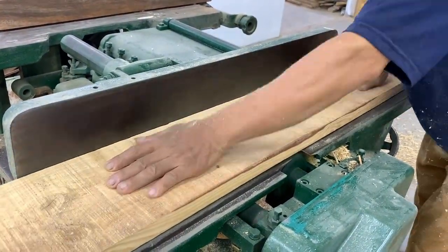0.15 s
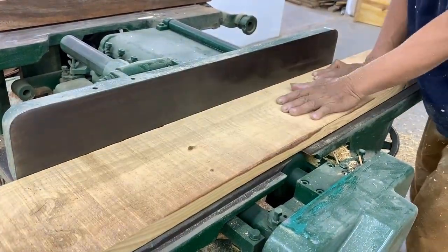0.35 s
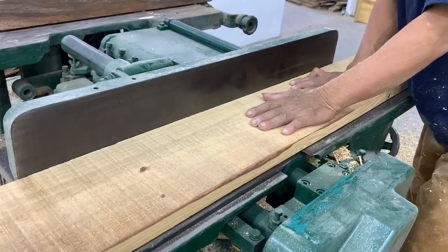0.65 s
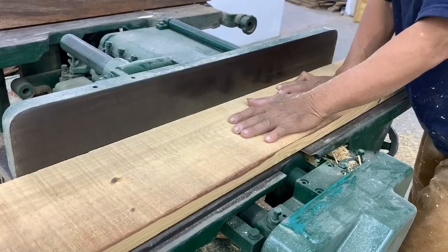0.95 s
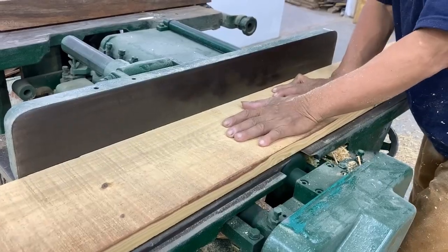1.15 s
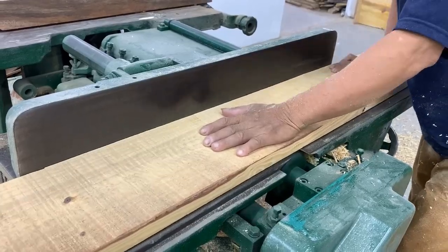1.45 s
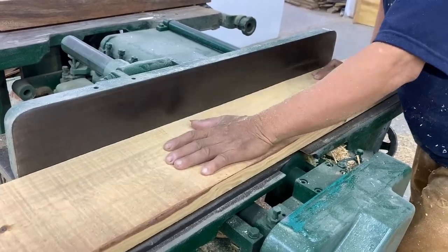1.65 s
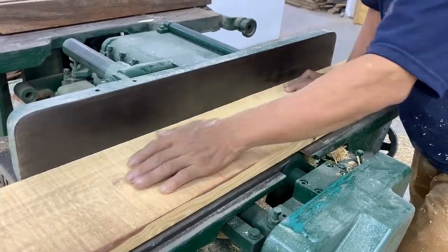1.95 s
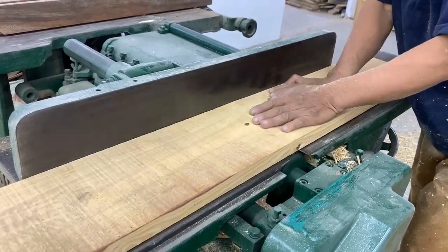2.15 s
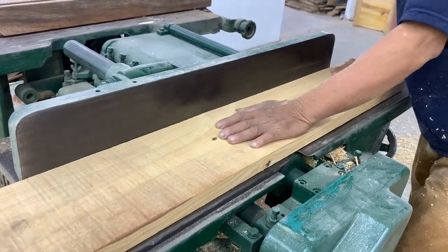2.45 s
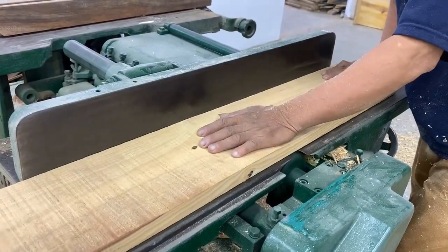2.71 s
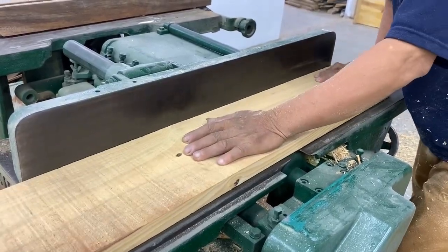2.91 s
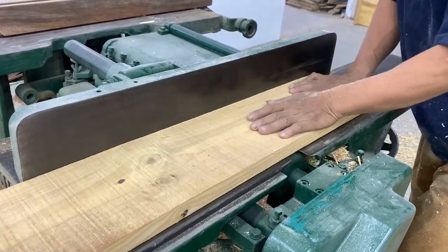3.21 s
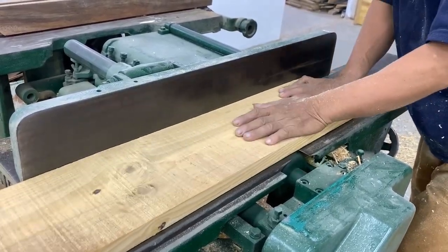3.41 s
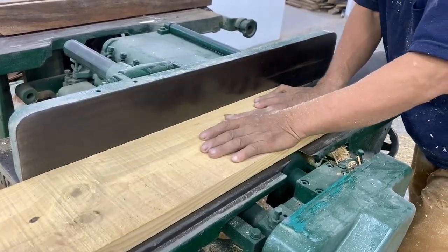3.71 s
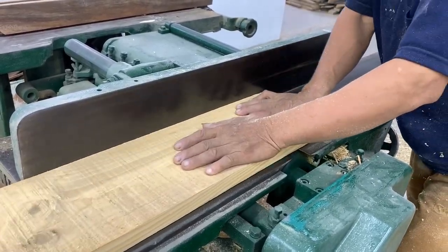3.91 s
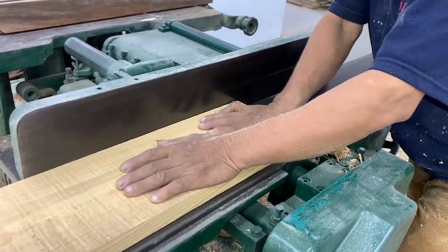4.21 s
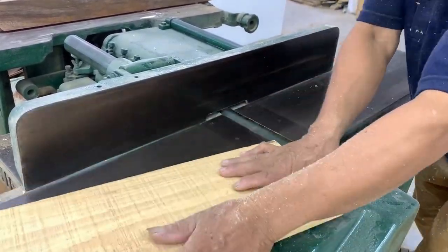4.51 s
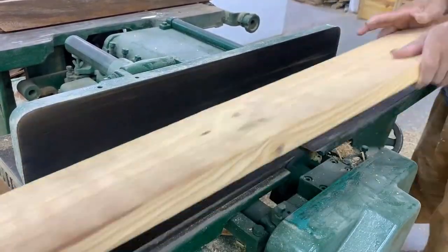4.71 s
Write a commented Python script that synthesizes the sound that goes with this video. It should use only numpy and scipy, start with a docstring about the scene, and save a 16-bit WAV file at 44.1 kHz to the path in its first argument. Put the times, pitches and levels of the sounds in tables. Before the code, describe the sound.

Close stereo pickup in a workshop: a jointer is already cutting, its rapid knives making a dense, bright buzz over a steady low hum, with motor whine, air rush and chip hiss. Pushes on the board make the cut swell and shift in colour. Near the end the board clears, the cut stops abruptly, and the bare machine hums on with faint wooden bumps.

```python
"""From the start a jointer's cutterhead planes a hand-pushed board: knife strikes as a tall harmonic stack
over the head's hum, whines of motor and drive as wavering tones, rush and chip hiss as shaped noise.
Shoves deepen the bite; splinters snap as short noise bursts. At 4.4 s the board clears the knives: the cut
dies, the bare head idles as fewer orders, and the lifted board bumps as decaying sines."""
import sys
import numpy as np
from scipy import signal
from scipy.io import wavfile
from scipy.ndimage import uniform_filter1d

SR = 44100
rng = np.random.default_rng(int(sys.argv[2]) if len(sys.argv) > 2 else 0)


def field_ratio(decibels):
    """Amplitude ratio for a level in dB (20 dB per decade); scalars and array-likes work."""
    return 10 ** (np.asarray(decibels, dtype=float) / 20)


def generate_wav(signal):
    """Clip the signal to [-1, 1] and save it as 16-bit WAV at the path in sys.argv[1]."""
    frames = np.transpose(np.atleast_2d(signal))
    scaled = np.clip(frames, -1, 1) * 32767
    pcm = np.round(scaled).astype(np.int16)
    wavfile.write(sys.argv[1], SR, pcm)


N = 214406
STEP = 256  # control step, samples

CUT_END_S, RING_DB_PER_S = 4.403, 1600  # board end clears the knives; decay of the ring
ROOM_DB, ROOM_DB_PER_S = -14, 250  # workshop tail after the cut
BITE_HZ, RISE_S, FALL_S = 3960, 0.035, 0.058  # pivot of the bite's tilt; ramps of a shove
HUM_BITE_HZ, BARE_S, LIFT_S, LIFT_RAMP_S = 1700, 0.2, 4.52, 0.025
DIP_HZ, TONE_HZ, DIP_FADE_S = 324, 150, 0.019
RUSH_SAG_DB_PER_S, RUSH_BARE_DB = -0.52, -0.5
LOW_CUT_HZ, EDGE_HZ = 60, 15730

# Cutterhead speed under load. Each row: time in seconds, knife strike rate in Hz.
SPEED = [(0.13, 236.27), (0.43, 236.55), (0.62, 236.16), (0.81, 236.44), (1.07, 236.13), (1.41, 235.97),
         (1.52, 236.23), (1.75, 235.75), (2.3, 235.8), (2.49, 236.47), (2.62, 236.05), (2.9, 236.2),
         (3.11, 235.61), (3.44, 235.84), (3.55, 235.52), (3.98, 235.55), (4.34, 234.98), (4.51, 236.6),
         (4.74, 236.7)]
# Hum orders 1-4. Each row: start level in dB, sag under the board in dB per second, share of the bite's dB,
# level once bare in dB, level once the board is lifted in dB.
HUM = [(-39.5, -1.12, 0.19, -47, -51), (-32, -1, 0.093, -31, -26), (-32, 0.07, 0.59, -36.5, -34),
       (-23, -0.26, 0.29, -23.5, -21)]
# Left port's lead for hum orders 1-4, in radians.
HUM_LEAD_RAD = [.4, .75, 1.5, 2.15]
# Phase of each bare hum order against the covered one, in radians.
BARE_TURN_RAD = [0.48, 2.46, 2.3, 0.19]
# Hum swell. Each row: time in seconds, level change in dB.
HUM_SWELL = [(0, 0), (.4, 0), (.8, -1), (1.3, -1.5), (1.46, -2.5), (1.9, -0.5), (2.06, -2), (2.47, -2),
             (2.55, -1), (2.75, -2.5), (3.15, -3), (3.4, -1.5), (3.55, -3.5), (3.9, -3), (4.2, -3.5),
             (4.4, -3)]
# Average strike through board, table and fence, before the bite.
# Each row: order, left level in dB, right level in dB, left lead in radians.
STRIKE = [(5, -41, -41, 3.0), (6, -38, -37, -3.1), (7, -41, -42, -1.7), (8, -43, -44, -1.3),
          (9, -40, -37, -0.3), (10, -39, -37, -2.5), (11, -42, -38, 0.8), (12, -41, -37, 1.7),
          (13, -40, -33, -2.2), (14, -39, -39, -1.7), (15, -38, -38, 0.5), (16, -32, -32, 2.1),
          (17, -31, -32, 2.5), (18, -35, -36, 3.1), (19, -38, -39, -2.2), (20, -36, -36, 0.5),
          (21, -35, -35, 0.4), (22, -36, -35, 0.8), (23, -37, -34, 0.8), (24, -39, -35, 1.1),
          (25, -40, -37, 0.2), (26, -41, -38, 0.7), (27, -42, -40, -1.4), (28, -38, -37, -2.0),
          (29, -42, -40, -0.1), (30, -39, -38, -0.6), (31, -44, -44, -1.2), (32, -43, -43, -0.4),
          (33, -45, -43, -2.6), (34, -41, -40, -0.5), (35, -41, -39, -0.7), (36, -44, -41, 0.2),
          (37, -45, -41, 0.3), (38, -44, -39, 0.6), (39, -44, -41, 1.2), (40, -44, -40, 1.6),
          (41, -48, -45, 2.1), (42, -47, -45, 2.3), (43, -48, -46, 2.2), (44, -49, -46, 2.4)]
# Upper orders of the strike, joined by lines. Each row: order, left in dB, right in dB, left lead in radians.
STRIKE_TOP = [(41.57, -47.5, -42, 2.46), (47.3, -51.5, -56, 2), (52, -57, -51, 2.7), (55.3, -55, -63, 6.9),
              (60, -68, -56, 5.6), (65.9, -62, -57, 7.2)]
# Bite between shoves. Each row: time in seconds, dB over the average strike,
# tilt about BITE_HZ in dB per octave.
BITE = [(0.0, -9, -3), (0.3, -7, 0.55), (0.6, -4.5, -0.2), (1.0, -2, 0.8), (1.4, -2.5, 1.2), (1.9, -5.5, 2),
        (2.35, -2.1, 0.8), (2.55, -4.5, 1), (3.1, -2, -0.8), (3.7, -0.7, 0.3), (4.1, -3.5, -0.3),
        (4.4, 0.5, 0.7)]
# Shoves that deepen the bite. Each row: start in seconds, length in seconds, gain in dB, centre in Hz,
# width in octaves.
SHOVES = [(0.219, 0.25, 8, 2360, 1.24), (0.421, 0.067, 8.5, 6200, 3.3), (0.675, 0.086, 10, 5140, 3),
          (0.728, 0.16, 9, 4770, 1.6), (0.864, 0.15, 5, 4570, 1.4), (1.059, 0.17, 5.5, 3580, 0.88),
          (1.163, 0.17, 5.5, 5300, 1.4), (1.435, 0.15, 9.5, 3050, 1.07), (1.764, 0.49, 3, 7690, 0.86),
          (2.193, 0.12, 8.5, 3900, 0.68), (2.397, 0.15, 8, 2900, 0.96), (2.642, 0.395, 6.5, 2830, 1.2),
          (3.28, 0.24, 6, 4370, 1.2), (3.548, 0.12, 6.5, 4370, 0.8), (3.714, 0.19, 7, 4450, 0.46),
          (3.851, 0.3, 7.5, 4580, 0.5), (4.128, 0.26, 4.5, 2160, 1.03)]
# Colour of the board's ringing. Each row: frequency in Hz, gain in dB.
BOARD = [(1680, 1.5), (2850, 0), (5620, -1), (8650, 0), (12700, 5)]
# Narrow dips and rings that glide as the board slides on. Each row: start in seconds, end in seconds,
# first pitch in Hz, last pitch in Hz, gain in dB.
DIPS = [(0, 0.707, 4480, 4320, 9), (-0.5, 0.96, 4500, 9600, -5), (1, 1.1, 9600, 9800, 7.5),
        (0.5, 1.9, 11400, 11400, -9), (0.5, 2.05, 2400, 3540, -3.5), (1.1, 2.23, 7200, 10700, 3.5),
        (1.1, 2.64, 3650, 8700, -6), (1, 3.7, 1950, 3140, -3.5), (2, 2.435, 2660, 2950, 8),
        (2.45, 3.07, 4300, 4380, -13.5), (1.5, 3.4, 6600, 7200, 5), (2.5, 3.6, 9200, 8850, 3),
        (2.5, 3.8, 10200, 11700, -7.5), (1.5, 3.3, 4770, 8300, -5), (3, 4.1, 1730, 1940, -7.5),
        (4.5, 4.06, 2000, 4200, -7), (3.5, 4.5, 1050, 930, 8.5), (3, 3.8, 7040, 7600, -6),
        (3.28, 3.2, 3100, 2800, 4), (3.5, 4.2, 6070, 5100, 2.5), (0, 1.42, 4100, 5900, 0.5)]
# Single tones swell or fade as the board's free length changes. Each row: start in seconds, end in seconds,
# first pitch in Hz, last pitch in Hz, gain in dB.
TONES = [(0.02, 0.7, 4150, 4400, -5), (0.12, 0.43, 5110.0, 5630, 4.5), (0.26, 1.9, 1620, 2700, 5),
         (0.36, 0.63, 3630.0, 3530.0, -7.2), (0.48, 1.04, 5200, 5190.0, -4), (0.66, 1.4, 6500, 6800.0, -4),
         (0.68, 1.56, 2560.0, 3170.0, -8), (0.68, 2.14, 7700, 8160.0, -3), (0.7, 1.1, 9600, 9600, -6),
         (0.92, 1.16, 3960.0, 4040.0, 7), (1.26, 2.68, 5320, 6250.0, 6), (1.5, 1.7, 4480.0, 4450, 9.5),
         (1.54, 2.9, 1560.0, 1010.0, 4.0), (1.58, 2.46, 3200, 3480.0, 5.5), (1.72, 2.4, 4400.0, 4040, -6),
         (1.9, 2.34, 6560, 7100, -11), (1.92, 3.1, 5840, 7100, 6), (2.02, 3.48, 7830.0, 5840, 4.5),
         (2.3, 2.92, 7670.0, 8520.0, -5), (2.34, 3.08, 4500.0, 4240.0, 6), (2.38, 3.1, 4010.0, 3760.0, -3),
         (2.62, 3.2, 5340, 6150, -3), (2.68, 3.2, 2550.0, 2656, -15), (2.94, 4.14, 8000, 8020.0, 3),
         (3.14, 4.1, 4000, 4400, 4), (3.2, 3.45, 7100.0, 6980.0, 5.5), (3.3, 3.7, 2780, 2530, 4.6),
         (3.5, 4.3, 1320.0, 700.0, -7.5), (3.96, 4.1, 2400, 2240, -4.6), (4.12, 4.2, 3770.0, 3820.0, -11.3)]
# Ring of the board's free end: onset in seconds, full at in seconds, centre in Hz, width in Hz, gain in dB.
END_RING = (4.14, 4.22, 4480, 300, 8)
# Second contact across the warped board. Each row: time in seconds, lag in ms, signed strength (linear).
TWIN = [(0.0, 0.092, 0.047), (0.3, 0.28, 0.17), (0.68, 0.21, 0.28), (0.8, 0.28, 0.08), (1.3, 0.39, 0.039),
        (1.6, 0.32, 0.38), (1.9, 0.32, -0.33), (2.2, 0.33, -0.72), (2.45, 0.26, -0.39), (2.65, 0.25, 0.31),
        (3.0, 0.25, 0.52), (3.15, 0.22, -0.053), (3.45, 0.19, -0.82), (3.65, 0.18, 0.2), (3.9, 0.12, 0.21),
        (4.06, 0.13, 0.56), (4.2, 0.086, 0.74), (4.35, 0.031, 0.37)]
# Bare knives chopping air past the table lips.
# Each row: order, left level in dB, right level in dB, left lead in radians.
IDLE = [(5, -52, -55, 3.5), (6, -41, -39.5, -2.5), (7, -45, -47, -2.0), (8, -45, -42, -1.2),
        (9, -62, -56, 2), (10, -41, -41.5, 1.4), (12, -43, -40, 1.65), (14, -43, -41.5, 4.5),
        (16, -56, -58, 2.3), (17, -56, -55, 3), (18, -47, -45.5, 3), (20, -57, -56, -3), (22, -58, -50, .2),
        (24, -63, -56, -2), (26, -60, -60, -1), (28, -61, -57, -3.5), (40, -58, -56, -0.2)]
# Drive whistle. Each row: time in seconds, pitch in Hz, level in dB.
WHISTLE = [(0.0, 674.5, -40), (0.04, 669.5, -35), (0.15, 669.6, -39), (0.38, 665.4, -33),
           (0.49, 664.5, -37), (0.69, 660.1, -37), (0.82, 667, -33), (0.95, 668.5, -42), (1.26, 668, -39),
           (1.37, 667.4, -43), (1.53, 667, -37), (1.61, 668.5, -42.5), (3.41, 666.0, -38.5),
           (4.13, 667.5, -40), (4.18, 664, -38), (4.45, 663, -42.5), (4.7, 667.6, -40), (4.86, 654.7, -39)]
# Each row: order of the whistle, relative level in dB, left lead in radians.
WHISTLE_ORDERS = [(1, 1, 2.21), (2, -13.5, -1.98), (3, -3, -2.1)]
# High motor whine. Each row: time in seconds, pitch in Hz, level in dB.
MOTOR_WHINE = [(0.0, 2781.5, -43), (0.13, 2782, -44.5), (0.43, 2779, -33.5), (0.47, 2776.5, -44.5),
               (0.76, 2773, -33.5), (0.84, 2781.5, -40), (1.14, 2782, -47), (1.73, 2780.5, -41),
               (2.1, 2783, -49), (2.23, 2780.5, -42.5), (2.73, 2779, -36.5), (3.65, 2776, -39),
               (4.02, 2780, -44.5), (4.3, 2774, -33), (4.48, 2776.5, -44.5), (4.86, 2780, -39.5)]
# The whine and its lower partner. Each row: pitch ratio, relative level in dB, left lead in radians.
MOTOR_WHINE_PARTS = [(1, 3, 1.84), (.7703, -3.5, 0.9)]
# Motor and belt whine. Each row: pitch in Hz, level in dB, left lead in radians, width in Hz,
# waver depth (linear).
BELT_WHINE = [(585, -54, 1.45, 18, 0.87)]
# Lowest part of the rush. Each row: frequency in Hz, density in dB per Hz before sag and patches.
RUMBLE = [(25, -117), (60, -113), (100, -103)]
# Air and bearing rush. Each row: frequency in Hz, density in dB per Hz before sag and patches.
RUSH = RUMBLE + [(150, -85.5), (220, -73), (500, -71.0), (850, -71), (1300, -76.0), (2500, -72.0),
        (4500, -76.5), (7000, -83), (8600, -81), (9200, -77.5), (10500, -86.0), (13200, -78.5),
        (15500, -82)]
# Chip hiss. Each row: frequency in Hz, density in dB per Hz before bite and patches.
CHIPS = [(300, -130), (800, -94), (2000, -81), (3300, -82), (4200, -84), (5500, -75), (7000, -77),
         (8000, -80), (10500, -89), (13000, -83), (15500, -83)]
# Likeness of the noise at the two ports. Each row: frequency in Hz, correlation (0 to 1).
LIKENESS = [(100, 0.11), (300, 1), (1300, 0.51), (3000, 0.35), (4200, 0.23), (6500, 0.68), (10500, 0.21),
            (15000, 0.18)]
# Left port's lead in the noise. Each row: frequency in Hz, lead in radians.
NOISE_LEAD = [(0, 0), (1180, 3.0), (2120, 6.1), (2830, 8.1), (3300, 11), (3780, 14.7), (4250, 15.7),
              (4720, 19.3), (8500, 19), (9700, 21), (11800, 21.9), (13000, 24), (15500, 25.2)]
# Splinters. Each row: start in seconds, level in dB before the noise scaling and high-pass.
SNAPS = [(.047, -27), (.128, -25), (.14, -27), (.155, -26), (.241, -28), (.55, -23), (2.559, -21),
         (3.159, -24), (4.398, -19)]
# Bumps of the lifted board. Each row: start in seconds, level in dB before the rise, pitch in Hz.
KNOCKS = [(4.601, -37, 300), (4.725, -30, 330), (4.749, -25, 360)]


def read(points, hz):
    """Reads a spectrum on a log-frequency axis."""
    f, value = np.transpose(points)
    return np.interp(np.log(hz + 1), np.log(f + 1), value)


def drift(shape, seconds):
    """Slow complex chance of rms 1 along the last axis."""
    width = max(round(seconds * SR / STEP), 1)
    a, b = (uniform_filter1d(uniform_filter1d(rng.standard_normal(shape), width), width) for _ in "ab")
    return (a + 1j * b) / np.sqrt(np.mean(a ** 2 + b ** 2))


def ports(left_db, right_db, lead_rad):
    """Complex peak gain of a tone of given rms level at the two microphone ports."""
    half_leads = np.multiply.outer([.5j, -.5j], lead_rad)
    return np.sqrt(2) * field_ratio(np.array([left_db, right_db])) * np.exp(half_leads)


def play(turns, gains):
    """A tone whose slow complex gains (port, step) ride on the running phase."""
    at, steps = np.arange(N) / STEP, np.arange(gains.shape[1])
    phase = (2 * np.pi * (turns % 1)).astype(np.float32)
    cos, sin = np.cos(phase), np.sin(phase)
    return np.array([np.interp(at, steps, g.real) * cos - np.interp(at, steps, g.imag) * sin for g in gains])


def bite_db(hz, t):
    """Bite over frequency and time: the board's colour, the feed, and each shove around its own pitch."""
    s, db, tilt = np.transpose(BITE)
    octaves = np.log2((hz[:, None] + 1) / BITE_HZ)
    out = read(BOARD, hz)[:, None] + np.interp(t, s, db) + octaves * np.interp(t, s, tilt)
    for start, length, shove_db, centre_hz, width_oct in SHOVES:
        if start + length > CUT_END_S - FALL_S:
            length = np.inf  # the last shove runs off the board's end
        held = np.clip(np.minimum((t - start) / RISE_S, (start + length - t) / FALL_S), 0, 1)
        around = np.exp(-.5 * (np.log2((hz + 1) / centre_hz) / width_oct) ** 2)
        out = out + shove_db * np.outer(around, held)
    return out


def dips_db(hz, t):
    """Dips and rings of the sliding board, each gliding from one pitch to another."""
    out = np.zeros((len(hz), len(t)))
    for rows, width_hz in (DIPS, DIP_HZ), (TONES, TONE_HZ):
        for start, end, from_hz, to_hz, db in rows:
            centre_hz = from_hz + (to_hz - from_hz) * (t - start) / (end - start)
            off = (hz[:, None] - centre_hz) / width_hz
            held = np.clip(np.minimum(t - start, end - t) / DIP_FADE_S, 0, 1)
            out += db * np.exp(-.5 * off ** 2) * held
    return out


def fade(t):
    """The cut's sound dies fast once the board has passed; the room lingers a little."""
    after, room = np.maximum(t - CUT_END_S, 0), field_ratio(ROOM_DB)
    return (1 - room) * field_ratio(-RING_DB_PER_S * after) + room * field_ratio(-ROOM_DB_PER_S * after)


def hum(t):
    """Complex gain per hum order: sags under the board, follows the bite, yields to the bare head's tone."""
    bite = bite_db(np.array([HUM_BITE_HZ]), t)[0]
    swell = np.interp(t, *np.transpose(HUM_SWELL))
    bare = np.clip((t - CUT_END_S - .03) / BARE_S + 1, 0, 1) ** 2
    lifted = np.clip((t - LIFT_S) / LIFT_RAMP_S, 0, 1)
    levels = []
    for (db, sag, share, bare_db, lifted_db), turn in zip(HUM, BARE_TURN_RAD):
        covered_tone = field_ratio(db + sag * t + share * bite + swell)
        bare_tone = np.exp(1j * turn) * field_ratio(bare_db + (lifted_db - bare_db) * lifted)
        levels.append((1 - bare) * covered_tone + bare * bare_tone)
    return levels


def second_contact(tone_hz, t):
    """Comb from a lagging second contact across the board, duller than the first."""
    s, lag_ms, strength = np.transpose(TWIN)
    strength = np.outer(1 / (1 + (tone_hz / 7500) ** 4), np.interp(t, s, strength))
    lag_turns = np.outer(tone_hz, np.interp(t, s, lag_ms)) / 1000
    return (1 + strength * np.exp(-2j * np.pi * lag_turns)) / np.sqrt(1 + strength ** 2)


def end_ring_db(tone_hz, t):
    """Resonance of the board's free end, growing in near the end of the cut."""
    start, full, ring_hz, width_hz, db = END_RING
    peak = 1 / (1 + (2 * (tone_hz - ring_hz) / width_hz) ** 2)
    return db * np.outer(peak, np.clip((t - start) / (full - start), 0, 1))


def cutterhead(turns):
    """Hum, knife strikes in wood and bare knives in air, all orders of one strike rate."""
    wander, wander_s, apart_hz = .22, 0.078, 7000
    flutter, flutter_s, judder, judder_s = .04, .012, 0.2, .015
    turn_rad, turn_s, turn_hz, smear_rad = .9, .2, 4300, 1.2
    t = np.arange(N // STEP + 2) * STEP / SR

    top = np.transpose(STRIKE_TOP)
    top_orders = np.arange(top[0, 0].round(), top[0, -1].round() + 1)
    top_rows = [top_orders] + [np.interp(top_orders, top[0], c) for c in top[1:]]
    order, *strike = np.hstack([np.transpose(STRIKE), top_rows])  # orders in both: the top's value holds
    order = order.round().astype(int)
    tone_hz = order * np.transpose(SPEED)[1].mean()

    smear = np.exp(1j * np.cumsum(smear_rad * rng.standard_normal(len(order))))  # bands arrive at own times
    shape = (2, len(order), len(t))
    paths = drift(shape, wander_s)  # hands and grain shift the paths, alike at both ports in the bass
    alike = np.exp(-(tone_hz[:, None] / apart_hz) ** 2)
    paths[1] = alike * paths[0] + np.sqrt(1 - alike ** 2) * paths[1]
    chance = 1 + wander * paths + flutter * drift(shape, flutter_s)
    chance /= np.sqrt(1 + wander ** 2 + flutter ** 2)
    chance *= (1 + judder * drift(len(t), judder_s).real) * fade(t)  # the feed judders, all orders together
    high = 1 / (1 + (turn_hz / tone_hz[:, None]) ** 6)
    chance *= np.exp(1j * turn_rad * drift(shape, turn_s).real * high)  # shifting path of the high tones

    gains = np.zeros((2, order[-1] + 1, len(t)), complex)
    level = field_ratio(bite_db(tone_hz, t) + dips_db(tone_hz, t) + end_ring_db(tone_hz, t))
    gains[:, order] = (ports(*strike) * smear)[..., None] * level * second_contact(tone_hz, t) * chance
    for k, (hum_level, lead) in enumerate(zip(hum(t), HUM_LEAD_RAD)):
        gains[:, k + 1] = ports(0, 0, lead)[:, None] * hum_level
    bare = np.clip((t - CUT_END_S) / 0.023, 0, 1)  # the board no longer covers the knives
    for k, *tone in IDLE:
        waver = np.exp(2j * np.pi * rng.random()) * (1 + 0.21 * drift(len(t), 0.049))
        gains[:, round(k)] += ports(*tone)[:, None] * bare * waver
    return sum(play(k * turns, gains[:, k]) for k in range(1, order[-1] + 1))


def glide(curve, parts, depth=0.27, waver_s=.05):
    """Wavering tones tied to one pitch and level curve."""
    s, hz, db = np.transpose(curve)
    turns = np.cumsum(np.interp(np.arange(N) / SR, s, hz)) / SR
    t = np.arange(N // STEP + 2) * STEP / SR
    level = field_ratio(np.interp(t, s, db))
    out = 0
    for ratio, part_db, lead in parts:
        waver = 1 + depth * drift(len(t), waver_s)
        out = out + play(ratio * turns, ports(part_db, part_db, lead)[:, None] * level * waver)
    return out


def motor():
    """Drive whistle and motor whine on gliding pitches, plus a wavering whine of fixed pitch."""
    out = glide(WHISTLE, WHISTLE_ORDERS) + glide(MOTOR_WHINE, MOTOR_WHINE_PARTS)
    for hz, db, lead, width_hz, depth in BELT_WHINE:
        waver = 1 + depth * drift(N // STEP + 2, 1 / width_hz)
        out += play(hz * np.arange(N) / SR, ports(db, db, lead)[:, None] * waver)
    return out


def noise(field_db, patchy_db):
    """Random short-time spectra at both ports; field_db(hz, t) in dB per Hz, patchy_db its random rms."""
    frames, hz = N // STEP + 5, np.fft.rfftfreq(4 * STEP, 1 / SR)
    t = np.arange(frames) * STEP / SR
    a, b, c, d, patches = rng.standard_normal((frames, len(hz), 5)).T
    patches = uniform_filter1d(uniform_filter1d(patches, size=14, axis=0), size=10, axis=1)
    same = np.clip(read(LIKENESS, hz), -1, 1)[:, None]
    late = np.exp(-1j * np.interp(hz, *np.transpose(NOISE_LEAD)))[:, None]
    left = a + 1j * b
    right = same * late * left + np.sqrt(1 - same ** 2) * (c + 1j * d)
    overlap = dict(nperseg=4 * STEP, noverlap=3 * STEP)
    plain_rms = signal.istft(left, **overlap)[1].std()
    z = np.array([left, right]) * field_ratio(field_db(hz, t) + patchy_db * patches / patches.std())
    return signal.istft(z, **overlap)[1][:, :N] * np.sqrt(SR / 2) / plain_rms


def rush():
    """Air and bearing noise: the board muffles it steadily; its level resets once the head is bare."""
    def field_db(hz, t):
        sag = RUSH_SAG_DB_PER_S * (t - CUT_END_S / 2)
        return read(RUSH, hz)[:, None] + np.where(t < CUT_END_S, sag, RUSH_BARE_DB)
    return noise(field_db, patchy_db=1.6)


def chips(turns, follow=0.038, burst_strikes=1.0, bed=1.0):
    """Tearing fibres hiss in a burst after every strike, louder as the bite deepens."""
    gate = bed + np.exp(-(turns % 1) / burst_strikes)
    hiss = noise(lambda hz, t: read(CHIPS, hz)[:, None] + follow * bite_db(hz, t), patchy_db=2.5)
    return hiss * gate / np.sqrt(np.mean(gate ** 2)) * fade(np.arange(N) / SR)


def snaps(t60_s=0.33, low_hz=6000):
    """Splinters: bright noise cracks cut off after 600 samples, different at each port."""
    out, t = np.zeros((2, N)), np.arange(600) / SR
    cracks = rng.standard_normal((len(SNAPS), 2, len(t))) / 2
    for (s, db), crack in zip(SNAPS, cracks):
        at = round(s * SR)
        out[:, at:at + len(t)] += field_ratio(db - 60 * t / t60_s) * crack
    return signal.sosfilt(signal.butter(2, low_hz, "high", fs=SR, output="sos"), out)


def knocks(t60_s=0.062, rise_s=0.0041):
    """Dull wooden bumps: decaying sines with a soft rise."""
    out = np.zeros(N)
    for s, db, hz in KNOCKS:
        t = np.maximum(np.arange(N) / SR - s, 0)
        out += field_ratio(db - 60 * t / t60_s) * (1 - np.exp(-t / rise_s)) * np.sin(2 * np.pi * hz * t)
    return out


def scene():
    """The machine, the cut and the board, on one running count of strikes."""
    s, hz = np.transpose(SPEED)
    turns = np.cumsum(np.interp(np.arange(N) / SR, s, hz)) / SR
    machine_air = rush()
    return cutterhead(turns) + motor() + machine_air + chips(turns) + knocks() + snaps()


def roll_off(x):
    """The treble ends steeply here."""
    return signal.sosfilt(signal.butter(12, 15970, fs=SR, output="sos"), x)


def record(dry):
    """Low cut and steep band limit."""
    low_cut = signal.butter(2, LOW_CUT_HZ, "high", fs=SR, output="sos")
    edge = signal.firwin(511, EDGE_HZ, window=("kaiser", 9), fs=SR)
    mix = signal.oaconvolve(signal.sosfilt(low_cut, dry), edge[None], "same")
    return roll_off(mix)


dry = scene()
out = record(dry)
generate_wav(out)
```